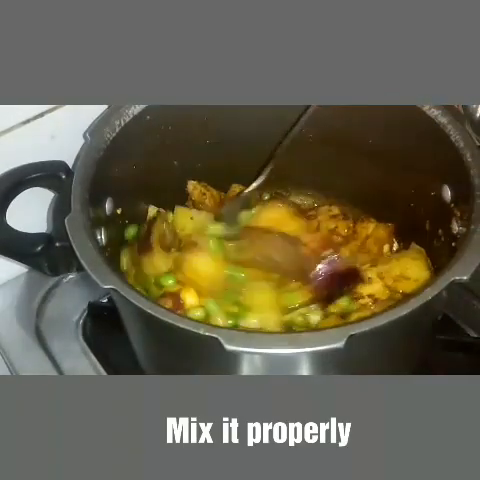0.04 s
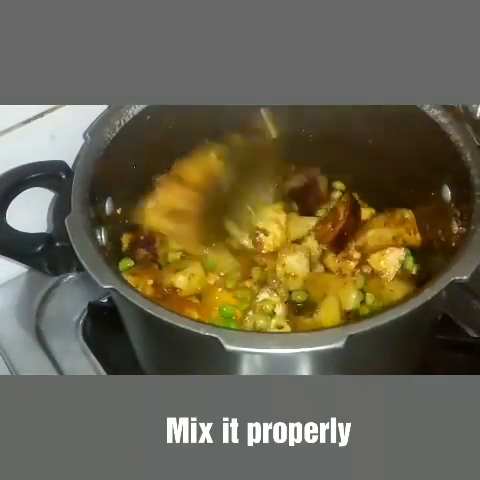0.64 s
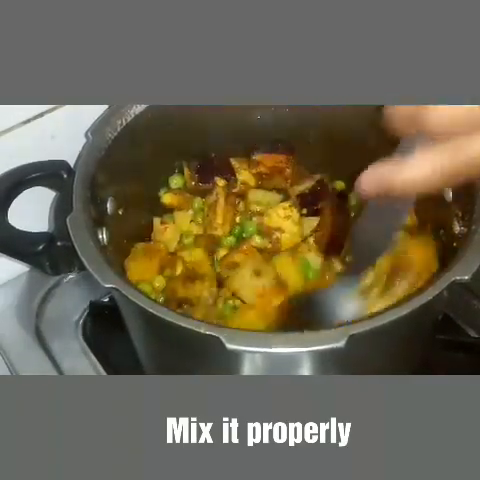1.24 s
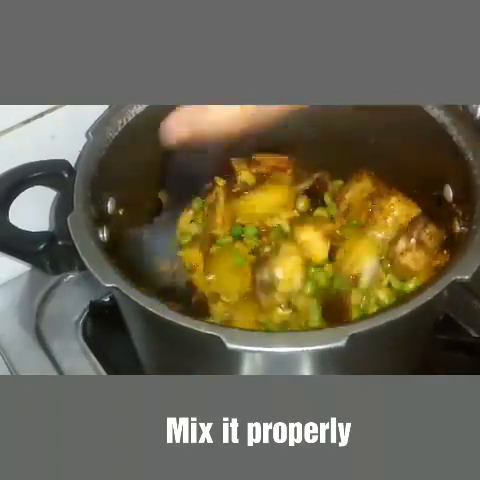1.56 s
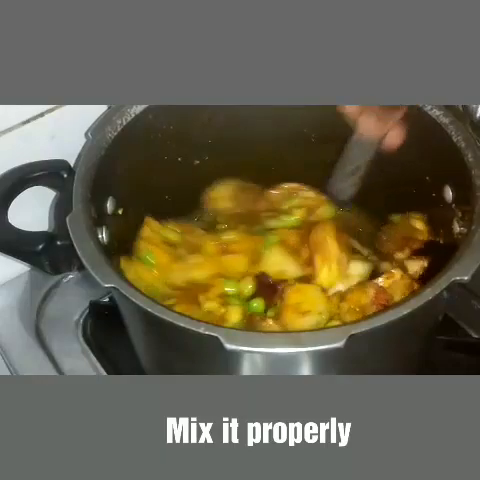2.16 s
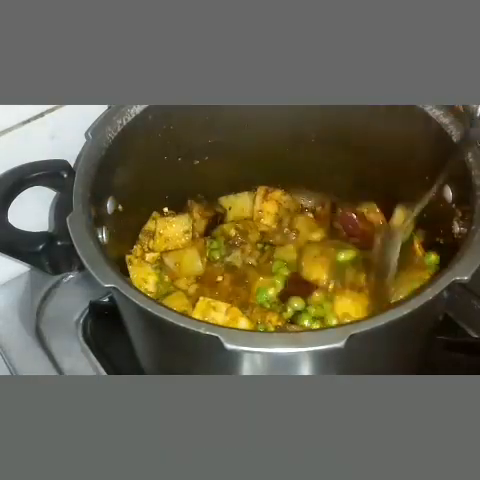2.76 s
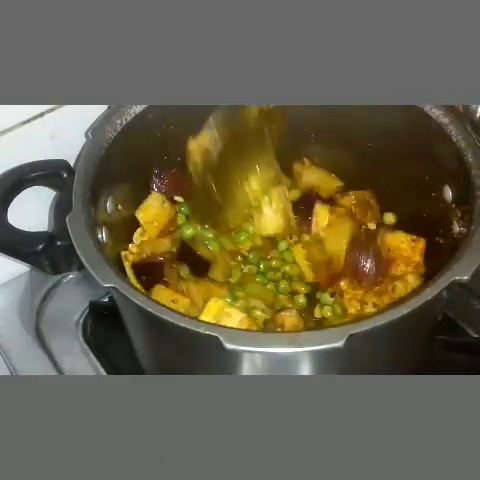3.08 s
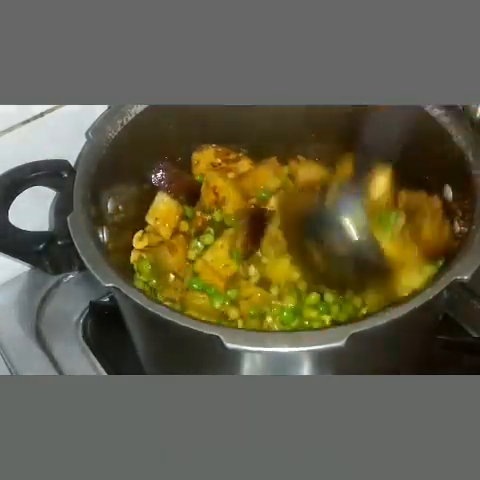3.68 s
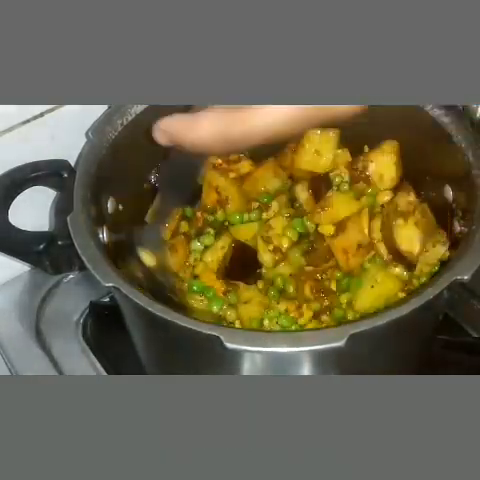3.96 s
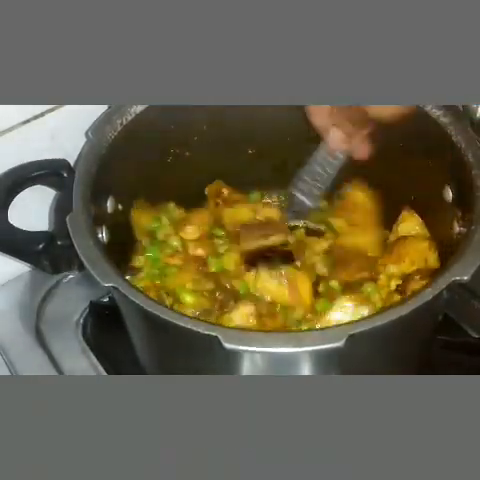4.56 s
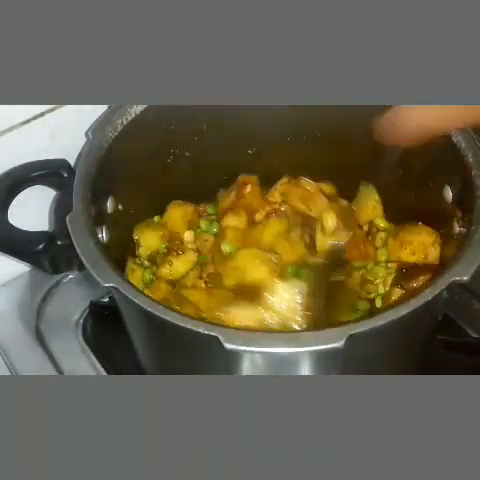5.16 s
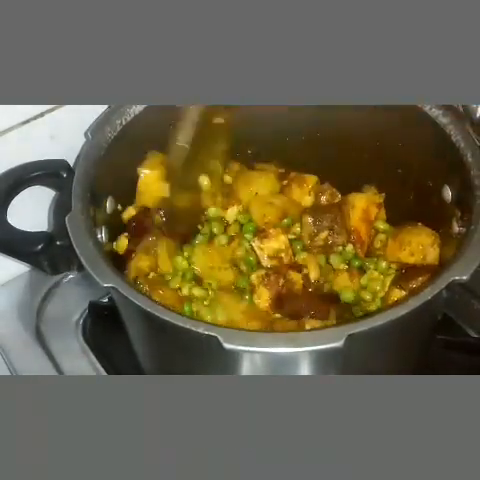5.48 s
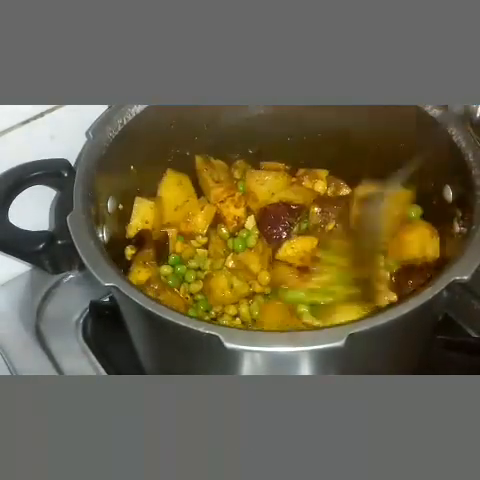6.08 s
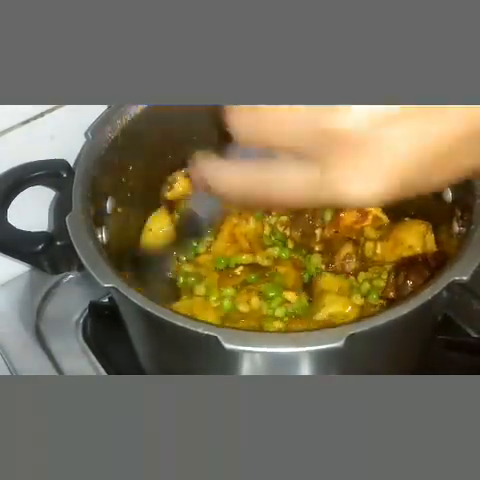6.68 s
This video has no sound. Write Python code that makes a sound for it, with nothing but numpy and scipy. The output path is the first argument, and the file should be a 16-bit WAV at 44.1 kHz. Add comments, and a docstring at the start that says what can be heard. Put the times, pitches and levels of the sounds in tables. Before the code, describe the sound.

A steel spoon stirs moist chopped vegetables in a thick metal pot. It clacks against the wall at uneven intervals, each hit quickly damped by the food, and scrapes over the bottom in short gritty strokes. Soft thumps and small squelches come between the hits as the pieces turn. A faint sizzle runs underneath and eases slightly. The stereo microphone stands near the stove in a bare, echoing kitchen.

```python
"""Stirring vegetables in a pot

A bare, echoing kitchen; a stereo microphone within earshot of the stove. A steel spoon stirs moist
chopped vegetables in a thick metal pot: it clacks against the wall, which the food damps, scrapes over
the bottom and turns the pieces, with squelches and soft thumps. Each contact is a rough force that
sounds the pot, and the room answers. Behind it, a faint sizzle of steam bubbles and low room tone."""
import sys
import numpy as np
from scipy import signal
from scipy.fft import rfft, irfft, next_fast_len
from scipy.io import wavfile
from scipy.ndimage import uniform_filter1d, map_coordinates

SR = 44100
rng = np.random.default_rng(int(sys.argv[2]) if len(sys.argv) > 2 else 0)


def bounce(signal):
    """Save signal as a 16-bit WAV file at the path given by the first command-line argument."""
    frames = np.transpose(np.atleast_2d(signal))
    limited = np.clip(frames, -1, 1)
    pcm = np.round(limited * 32767).astype(np.int16)
    wavfile.write(sys.argv[1], SR, pcm)


N = 305613
SIZE = 24576  # samples in one contact
HZ, T = np.fft.rfftfreq(SIZE, 1 / SR), np.arange(SIZE) / SR
LEAD_IN_S = .006  # a faint lead-in softens each hit's attack
SCRAPE_THUD_HZ = 367  # the food that a scrape carries along

# Likeness of left and right at the microphone: f/Hz, correlation
COHERENCE = [(60, 0.7), (150, 0.87), (330, 0.94), (700, 0.42), (1400, 0.0084), (10000, 0.024)]
# The kitchen's reverberation: f/Hz, t60/s
ROOM_DECAY = [(100, 0.2), (300, 0.38), (800, 0.4), (2000, 0.29), (5000, 0.31), (13000, 0.29)]
# Room against direct sound at the microphone: f/Hz, level/dB
ROOM_BALANCE = [(100, 10.5), (400, -2.5), (2000, -4), (5000, -1), (13000, -3.5)]
# Spectrum of the quiet kitchen: f/Hz, level/dB
ROOM_SPECTRUM = [(25, -21.5), (100, -10.5), (170, -3.5), (300, -12.5), (450, -12.5), (700, -17.5),
                 (1500, -33.5), (3000, -19.5), (6000, -78.5)]
# Course of the sizzle: t/s, level/dB
SIZZLE_LEVELS = [(0, -55.5), (0.9, -55), (1.6, -58.5), (2.4, -58.5), (3.3, -60), (6.93, -61.5)]
# Spectrum of the bursting bubbles: f/Hz, level/dB
SIZZLE_SPECTRUM = [(590, -50), (1000, -13.5), (1260, -7), (1890, -7.5), (3930, -5.5), (5380, -5.5),
                   (6330, -4.5), (11300, 0.5), (14500, -12.5), (15600, -30)]
# Steady resonances, low ones of the room, higher ones of pot and spoon: f/Hz, level/dB
RESONANCES = [(172, 10.5), (230, 4.5), (289, 7), (358, 9.5), (438, 8.5), (513, -5.5), (648, 3), (831, 8),
              (1246, 5), (1722, -16), (2257, -12.5), (2461, -4), (3734, -7.5), (4235, -2.5), (4314, 4),
              (4980, 2.5), (5760, 1.5), (8517, 0), (9667, 4), (10620, 0.5)]
# Click and zing bands of the spoon's edge: low/Hz, high/Hz, order of the low slope
EDGE_BANDS = [(4150, 7200, 5), (7700, 12500, 5)]
# Spectrum of the pot's feet on the stove: f/Hz, level/dB
STOVE_SPECTRUM = [(20, -9.5), (45, -7), (75, 2), (110, -7), (160, -15.5), (300, -48.5)]
# The pot jogs: t/s, level/dB
POT_BUMPS = [(.455, -60), (.55, -50), (1.021, -53), (1.7, -68), (2.803, -55.5), (2.966, -44),
             (3.571, -48.5), (4.319, -46.5), (5.249, -54), (5.32, -47), (6.614, -54)]
# Wet pieces pull apart: t/s, level/dB, f/Hz
FOOD_SQUELCHES = [(2.147, -41, 1810), (2.263, -48, 1470), (2.287, -42, 1666), (4.572, -36.5, 1740),
                  (4.741, -42.5, 1565), (6.312, -49, 1727)]
# Soft low thumps, pieces landing or the pot rocking on its burner: t/s, level/dB, f/Hz
SOFT_THUMPS = [(0.574, -28.5, 220), (1.423, -36.5, 340), (1.852, -20.5, 453), (1.992, -21.5, 360),
               (2.981, -29.5, 245), (3.578, -21, 236), (4.187, -25, 529), (4.32, -25, 187),
               (5.225, -33.5, 292), (5.807, -51.5, 410), (6.275, -49.5, 232)]
# Metal against a thump's thud: clank/dB, click/dB, zing/dB
THUMP_METAL = [-16, -31, -20.5]
# The spoon pushes food aside: peak/s, length/s, level/dB, f/Hz
FOOD_SHOVES = [(0.065, 0.072, -56, 269), (0.768, 0.14, -50, 409), (1.32, 0.1, -46, 265),
               (2.14, 0.13, -43, 355), (2.77, 0.064, -58, 285), (3.285, 0.12, -57, 349),
               (3.682, 0.41, -42, 548), (4.681, 0.12, -57.5, 213), (4.97, 0.077, -59, 222),
               (5.274, 0.098, -33.5, 268), (5.718, 0.21, -58, 376), (5.882, 0.23, -45.5, 444),
               (6.06, 0.38, -50, 805), (6.2, 0.31, -58, 333)]
# The edge catches in passing: t/s, level/dB
EDGE_TICKS = [(0.997, -27.5), (1.711, -28), (1.858, -33), (1.907, -22.5), (1.946, -27.5), (2.826, -19),
              (2.843, -20.5), (4.253, -35)]
# Colour of a tick: thud/dB, clank/dB, click/dB, zing/dB
TICK_COLOUR = [-27.5, -6, -13, 6.5]
# Strokes over the bottom: peak/s, rise/s, fall/s, thud/dB, clank/dB, click/dB, zing/dB
BOTTOM_SCRAPES = [(0.538, 0.029, 0.046, -41, -30, -31.5, -29), (0.61, 0.051, 0.1, -37.5, -35, -49.5, -40.5),
                  (0.841, 0.042, 0.051, -66, -66, -58.5, -64), (1.09, 0.046, 0.029, -54, -48, -47.5, -37.5),
                  (1.351, 0.06, 0.038, -45, -66, -39.5, -32), (1.885, 0.12, 0.042, -36, -41, -29.5, -25),
                  (2.06, 0.08, 0.097, -44, -48.5, -44.5, -55.5), (2.148, 0.076, 0.018, -55, -49, -65, -54),
                  (2.282, 0.037, 0.13, -75, -57.5, -64, -59), (2.83, 0.026, 0.13, -38, -28, -27.5, -29.5),
                  (3.5, 0.036, 0.02, -62, -66.5, -38.5, -36.5), (4.095, 0.041, 0.033, -45, -45, -38, -31.5),
                  (4.239, 0.063, 0.29, -45.5, -52.5, -40.5, -41),
                  (4.499, .11, 0.092, -45.5, -42.5, -45.5, -49.5),
                  (6.268, 0.12, 0.062, -84, -64.5, -62.5, -64),
                  (6.649, 0.033, 0.06, -42.5, -39.5, -42, -34)]
# Hits on the wall: t/s, thud/dB, thud/Hz, ring/dB, ring/Hz, clank/dB, clank/Hz, clank spread/factor,
# click/dB, zing/dB, pan/dB, chatter/s, slide/dB, slide rise/s, slide fall/s
WALL_CLACKS = [(0.451, -25, 466, -27.5, 790, -25.5, 1330, 1.9, -28, -19.5, 5, 0.0041, 1, 0.027, 0.089),
               (0.547, -15.5, 506, -19, 1260, -13.5, 1720, 1.32, -19, -16, 1, 0.0037, -3, 0.022, 0.062),
               (1.011, -23, 430, -25, 780, -24, 1700, 1.7, -24, -15, 10, 0.0038, -2.5, 0.033, 0.044),
               (1.289, -37.5, 295, -39.5, 1240, -40.5, 1520, 1.2, -21.5, -16, 4.5, 0.0034, -1, 0.019, 0.067),
               (1.669, -35, 362, -39, 643, -28, 1790, 2.1, -25, -16.5, 0, 0.0059, -1, 0.025, 0.12),
               (1.689, -18.5, 430, -21.5, 656, -15.5, 1630, 1.88, -18, -12, 4, 0.0047, -10, 0.018, 0.31),
               (2.802, -28.5, 720, -29.5, 305, -19, 2070, 1.66, -16, -12.5, -0.5, 0.0041, 9.5, 0.0025, 0.037),
               (2.961, -20, 436, -32, 306, -28, 1500, 1.9, -29.5, -24.5, -3, .005, 4, 0.019, 0.073),
               (3.405, -40, 423, -41, 430, -35, 1800, 1.8, -32, -27.5, 1.5, 0.0059, 9, 0.033, 0.095),
               (3.57, -12, 533, -9, 743, -23.5, 1900, 1.85, -21.5, -14, 2, 0.0036, -13.5, 0.0072, 0.059),
               (4.036, -34.5, 425, -34, 1040, -32.5, 1760, 1.63, -24, -17, 3.5, 0.0033, 2.5, 0.0064, 0.18),
               (4.301, -25.5, 470, -29, 520, -33.5, 1520, 2.1, -27.5, -20.5, 7, 0.0074, 8, 0.022, 0.049),
               (4.314, -29, 460, -25.5, 493, -29.5, 1990, 2, -27, -19.5, -3, 0.0045, 3.5, 0.011, 0.098),
               (4.333, -21.5, 395, -32, 490, -28, 1690, 2.1, -24.5, -21, 1, 0.0042, -6, 0.0096, 0.2),
               (5.312, -20.5, 507, -21, 560, -18, 2530, 1.03, -20.5, -15.5, 4, 0.0032, -5, 0.025, 0.073),
               (5.579, -37.5, 332, -37.5, 755, -51.5, 2110, 1.5, -68, -56, 0, 0.0085, 1.5, .008, 0.082),
               (6.486, -48, 348, -47, 803, -58.5, 2630, 1, -72, -59, -1, 0.0069, 7.5, 0.014, 0.084),
               (6.615, -31, 358, -43, 800, -21.5, 1970, 2.15, -19.5, -14.5, 0.5, 0.0056, -4.5, 0.0042, 0.11),
               (6.725, -57, 342, -60.5, 800, -34, 1750, 1.45, -28, -18.5, 1.5, 0.0034, -9, 0.0095, 0.015)]
# Colour of a slide against its clack: thud/dB, clank/dB, click/dB, zing/dB
SLIDE_COLOUR = [-10, -8.5, -10, -13.5]


def amp(db):
    """Decibels to gain."""
    return 10 ** (np.asarray(db) / 20)


def unit(x):
    """Scaled to rms 1."""
    return x / np.sqrt(np.mean(np.abs(x) ** 2) + 1e-20)


def along(points, hz):
    """A curve through (f/Hz, value) points on a log frequency axis."""
    f, v = np.transpose(points)
    return np.interp(np.log(hz + 1), np.log(f + 1), v)


def wobble(rate, size):
    """A smooth random curve, rate knots a second."""
    knots = rng.standard_normal(int(size * rate / SR) + 4)
    return map_coordinates(knots, [np.arange(size) * rate / SR])


def add(track, s, sound):
    """Mix a stereo sound in at time s."""
    start = max(round(s * SR), 0)
    part = sound[:, :N - start]
    track[:, start:start + part.shape[1]] += part


def stereo(pair, hz):
    """Two unrelated spectra become the microphone's left and right, alike only in the bass."""
    turn = np.arccos(np.clip(along(COHERENCE, hz), -1, 1)) / 2
    mid, side = pair[0] * np.cos(turn), pair[1] * np.sin(turn)
    return np.array([mid + side, mid - side])


def causal(gain):
    """The minimum-phase response with this gain: it rings only after the blow."""
    cepstrum = irfft(np.log(np.maximum(gain, 1e-6)))
    fold = np.r_[1, np.full(SIZE // 2 - 1, 2), 1, np.zeros(SIZE // 2 - 1)]
    return np.exp(rfft(cepstrum * fold))


def evened(pair, bins):
    """Both spectra brought to even power over bands of this many bins, wider above 1500 Hz."""
    power = np.abs(pair) ** 2
    smooth = np.where(HZ < 1500, uniform_filter1d(power, bins), uniform_filter1d(power, 360))
    return pair * np.array([causal(1 / np.sqrt(np.abs(side) + 1e-12)) for side in smooth])


def steady(excitation, spectrum):
    """A stereo bed: an excitation coloured by a spectrum, at rms 1."""
    size = next_fast_len(N + 8192)
    hz = np.fft.rfftfreq(size, 1 / SR)
    coloured = stereo(rfft(excitation, size), hz) * amp(along(spectrum, hz))
    return unit(irfft(coloured, size)[:, :N])


def room_tone(level_db=-72, waver_db=2.0):
    """The kitchen's low, slightly wavering background."""
    gain = amp(level_db + waver_db * wobble(4.8, N))
    return gain * steady(rng.standard_normal((2, N)), ROOM_SPECTRUM)


def kitchen(hold_s=0.0054, first_wall_s=0.0034):
    """The room's response from one spot: a dense tail that holds briefly and lasts longest in the mids."""
    hz, t, noise = signal.stft(rng.standard_normal((2, SIZE)), SR, nperseg=256)
    decay = amp(-60 * (np.hypot(t, hold_s) - hold_s) / along(ROOM_DECAY, hz)[:, None])
    tail = signal.istft(stereo(noise, hz[:, None]) * decay, SR, nperseg=256)[1][:, :SIZE]
    onset = np.clip(T / first_wall_s - 1, 0, 1)
    spectrum = evened(rfft(tail * onset), bins=50) * causal(amp(along(ROOM_BALANCE, HZ)))
    return rfft(irfft(spectrum), 2 * SIZE)


def at_microphone(sound, rooms, pan_db, shade_hz=4000, spot_s=.05, spots=7):
    """The direct treble leans to one side; the room answers anew from each spot the spoon passes."""
    first = rng.integers(len(rooms))
    position = np.minimum(T / spot_s, spots - 1)
    fades = [np.sqrt(np.maximum(1 - np.abs(position - k), 0)) for k in range(spots)]
    heard = irfft(sum(rfft(sound[0] * fade, 2 * SIZE) * rooms[(first + k) % len(rooms)]
                      for k, fade in enumerate(fades)))
    lean_db = pan_db / 2 * np.minimum(HZ / shade_hz, 1)
    heard[:, :SIZE] += irfft(rfft(sound) * amp([lean_db, -lean_db])) * (T < .45)
    return heard


def sizzle(burst_db=1.0, burst_rate=900):
    """Countless tiny steam bubbles burst on the hot bottom."""
    level_db = np.interp(np.arange(N) / SR, *np.transpose(SIZZLE_LEVELS))
    bursts = rng.standard_normal((2, N)) * amp(burst_db * wobble(burst_rate, N))
    return amp(level_db) * steady(bursts, SIZZLE_SPECTRUM)


def resonances(width_hz=8, loss=.003, top_hz=13900):
    """Power response of room, pot and spoon: damped modes on a broad base, weak in the deep bass."""
    modes = sum(amp(db) ** 2 / (1 + (2 * (HZ - hz) / (width_hz + loss * hz)) ** 2)
                for hz, db in RESONANCES)
    bass_db = along([(20, -12), (80, -17), (115, -21), (165, -9), (230, -3)], HZ)
    return (1 + modes) * amp(bass_db) ** 2 / (1 + (HZ / top_hz) ** 50)


def hollow_ring(hz, q=7.3):
    """Gain of a narrow hollow ring, with its own pitch for each hit on the wall."""
    return unit(1 / (1 + (q * ((HZ + 1) / hz - hz / (HZ + 1)) / 2) ** 2))


def colour(levels_db, thud_hz, body, clank_hz=1730, spread=1.83, thud_octaves=0.65, high_order=5.7):
    """Gain of one contact in four bands: the food's thud, the wall's clank, the edge's click and zing."""
    thud = np.exp(-.5 * (np.log2((HZ + 1) / thud_hz) / thud_octaves) ** 2)
    bands = [(clank_hz / spread, clank_hz * spread, 3), *EDGE_BANDS]
    metal = [1 / (1 + (low / (HZ + 1)) ** (2 * low_order)) / (1 + (HZ / high) ** (2 * high_order))
             for low, high, low_order in bands]
    power = np.array([thud, *metal]) * body
    return np.sqrt(amp(levels_db) ** 2 @ (power / power.mean(axis=1, keepdims=True)))


def shifting_treble(sound, depth_db=6, band_hz=170, change_s=.08, cap=1.1):
    """Shifting dips and mild peaks in the treble vary each contact's colour."""
    hz, t, frames = signal.stft(sound, SR, nperseg=512)
    where = np.meshgrid(hz / band_hz, t / change_s, indexing="ij")
    field = unit(map_coordinates(rng.standard_normal((160, 48)), where, order=1, mode="mirror"))
    gain = amp(depth_db * np.minimum(hz / 1200, 1)[:, None] * np.minimum(field, cap))
    return signal.istft(frames * unit(gain), SR, nperseg=512)[1][:, :SIZE]


def contact(force, gain):
    """A rough, broadband force sounds the pot."""
    rough = stereo(rfft(force * rng.standard_normal((2, SIZE))), HZ)
    push = evened(rough, bins=70) * np.linalg.norm(force)
    return shifting_treble(irfft(push * causal(gain))) * (T < .45)


def blow(chatter_s, energy_s=0.0021, bounce_db=0.5, lead_in_db=-15, lead_in_rise_s=0.0024):
    """Force of a hit: after a faint lead-in it bites and chatters twice more within milliseconds."""
    early, late = rng.uniform(0.46, 1.0, 2)
    t = T - LEAD_IN_S
    bite_s, gap_s = 0.88 * chatter_s, 0.72 * chatter_s
    touches = [(0, 0), (gap_s * early, bounce_db), (gap_s * (early + late), 2 * bounce_db)]
    power = sum(amp(db) ** 2 * (t >= at) * np.exp(-2 * np.abs(t - at) / bite_s) for at, db in touches)
    power += amp(lead_in_db) ** 2 * (t < 0) * np.exp(-2 * np.abs(t) / lead_in_rise_s)
    return np.sqrt(power * energy_s * SR / power.sum())


def drag(rise, fall, swell=0.88, slip_db=3.5, slip_rate=700, lump_db=-0.5, lump_rate=80, touch_s=.02):
    """Time to the peak, and force: pressure swells and eases, the edge sticks and slips, pieces bump."""
    knots = np.cumsum([0, min(touch_s, rise / 2), rise, fall, touch_s])
    pressure = amp(-20 * np.interp(T, knots, [2.5, 1, 0, 1, 5]) ** swell)
    grain = amp(slip_db * wobble(slip_rate, SIZE) + lump_db * np.tanh(wobble(lump_rate, SIZE)))
    return knots[2], unit(pressure * grain) * np.sqrt(np.mean(pressure ** 2))


def bumps(level_db=2, rise_s=0.004, fall_s=0.051):
    """Hard pushes jog the whole pot on the stove."""
    track = np.zeros((2, N))
    feet = unit(amp(along(STOVE_SPECTRUM, HZ)))
    for s, db in POT_BUMPS:
        lead, force = drag(rise_s, fall_s)
        add(track, s + rise_s - lead, contact(force, amp(level_db + db) * feet))
    return track


def air_pocket(hz, delay_s, cycles=8.3, glide=1.2):
    """A pocket of air opens between wet pieces and rings briefly, rising in pitch."""
    t = np.maximum(T - delay_s, 0)
    age = t * hz / cycles
    phase = 2 * np.pi * hz * t * (1 + glide * t) + wobble(hz / 3, SIZE)
    return age * np.exp(2 - 2 * age) * np.sin(phase)


def squelches(rooms, level_db=-6):
    """The larger air pockets stand out singly, in the centre."""
    track = np.zeros((2, N))
    for s, db, hz in FOOD_SQUELCHES:
        pocket = amp(db + level_db) * air_pocket(hz, 0)
        add(track, s, at_microphone(np.tile(pocket, (2, 1)), rooms, pan_db=0))
    return track


def thumps(body, rooms, level_db=-3, pan_db=-1):
    """Pieces land, or the pot rocks on its burner: a soft low knock with a quieter tail."""
    track = np.zeros((2, N))
    onset, tail = (0, 0.00652, 0.03), (-12, 0.017, 0.13)  # level/dB, rise/s, fall/s
    for s, db, hz in SOFT_THUMPS:
        gain = colour(level_db + db + np.r_[0, THUMP_METAL], hz, body)
        for stage_db, rise, fall in (onset, tail):
            lead, force = drag(rise, fall)
            knock = contact(force, amp(stage_db) * gain)
            add(track, s + rise - lead, at_microphone(knock, rooms, pan_db))
    return track


def shoves(body, rooms, level_db=-1, pan_db=-1, rise_share=0.66, pocket_db=-10.5, pocket_count=5):
    """Soft pieces rub along the pot, hardly waking the metal; small air pockets open between them."""
    track = np.zeros((2, N))
    colour_db = np.array([0, -18, -24, -20.5])  # thud, clank, click, zing
    for peak, length, db, hz in FOOD_SHOVES:
        gain = colour(level_db + db + colour_db, hz, body)
        lead, force = drag(rise_share * length, (1 - rise_share) * length, slip_db=3, lump_db=5.5)
        pockets = sum(air_pocket(hz * 2 ** (0.43 * pitch), lead + length * when / 3) * amp(-9 * abs(when))
                      for pitch, when in rng.uniform(-1.8, 1, (pocket_count, 2)))
        rub = contact(force, gain) + amp(db + pocket_db) * pockets
        add(track, peak - lead, at_microphone(rub, rooms, pan_db))
    return track


def ticks(body, rooms, chatter_s=.004, pan_db=2):
    """In mid-scrape the edge catches and snaps free."""
    track = np.zeros((2, N))
    for s, db in EDGE_TICKS:
        gain = colour(db + np.array(TICK_COLOUR), SCRAPE_THUD_HZ, body)
        add(track, s - LEAD_IN_S, at_microphone(contact(blow(chatter_s), gain), rooms, pan_db))
    return track


def scrapes(body, rooms, pan_db=2):
    """Metal drags over metal with fine grit and stick-slip surges, carrying some food along."""
    track = np.zeros((2, N))
    for peak, rise, fall, *levels_db in BOTTOM_SCRAPES:
        lead, force = drag(rise, fall, swell=1.8, slip_db=5, lump_db=3, lump_rate=55)
        gain = colour(levels_db, SCRAPE_THUD_HZ, body)
        add(track, peak - lead, at_microphone(contact(force, gain), rooms, pan_db))
    return track


def clacks(body, rooms, slide_after_s=.005):
    """The spoon's edge hits the wall and slides on with nearly the same colour."""
    track = np.zeros((2, N))
    for (s, thud_db, thud_hz, ring_db, ring_hz, clank_db, clank_hz, spread,
         click_db, zing_db, pan_db, chatter_s, slide_db, rise, fall) in WALL_CLACKS:
        levels_db = np.array([thud_db, clank_db, click_db, zing_db])
        ring = amp(ring_db) * hollow_ring(ring_hz)
        hit_gain = np.hypot(colour(levels_db, thud_hz, body, clank_hz, spread), ring)
        hit = contact(blow(chatter_s), hit_gain)
        add(track, s - LEAD_IN_S, at_microphone(hit, rooms, pan_db))
        lead, force = drag(rise, fall)
        slide_gain = colour(levels_db + SLIDE_COLOUR, thud_hz, body, clank_hz, spread)
        slide = contact(force, amp(slide_db) * np.hypot(slide_gain, amp(SLIDE_COLOUR[0]) * ring))
        add(track, s + slide_after_s - lead, at_microphone(slide, rooms, pan_db))
    return track


def scene(spots=8):
    """Spoon, pot and food in front, the sizzle and the quiet room behind."""
    body, rooms = resonances(), [kitchen() for _ in range(spots)]
    stirring = sum(source(body, rooms) for source in (clacks, scrapes, ticks, shoves, thumps))
    return stirring + bumps() + squelches(rooms) + sizzle() + room_tone()


def record(dry, ceiling=.65, top_hz=15300):
    """The sharpest peaks are rounded off, the left side is a little brighter, and the top is cut."""
    rounded = dry / (1 + (dry / ceiling) ** 4) ** .25
    size = next_fast_len(N + 8192)
    hz = np.fft.rfftfreq(size, 1 / SR)
    lean_db = along([(2500, -0.6), (9000, 1.0)], hz)
    lowpass = 1 / np.sqrt(1 + (hz / top_hz) ** 120)
    return irfft(rfft(rounded, size) * amp([lean_db, -lean_db]) * lowpass, size)[:, :N]


dry = scene()
out = record(dry)
bounce(out)
```